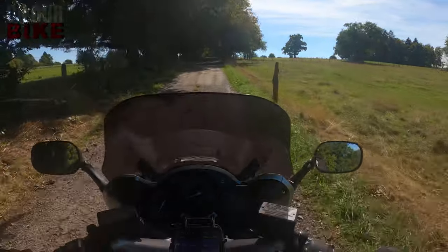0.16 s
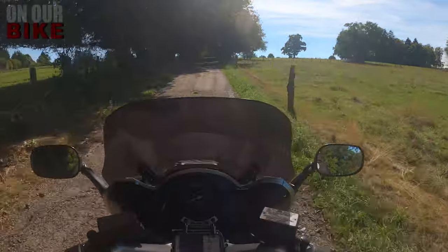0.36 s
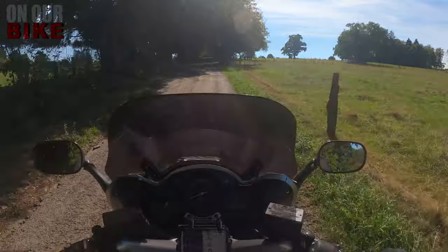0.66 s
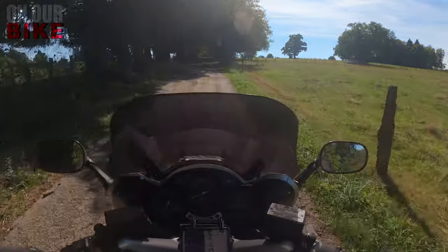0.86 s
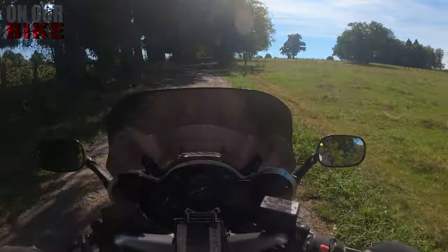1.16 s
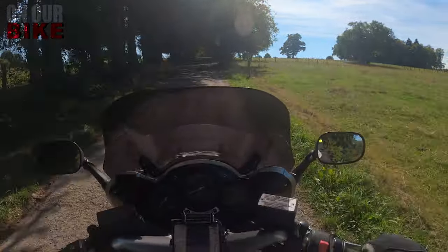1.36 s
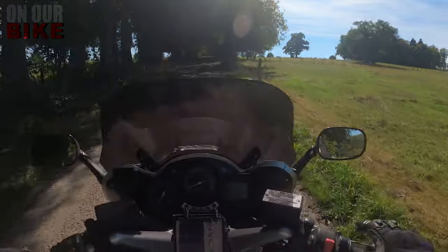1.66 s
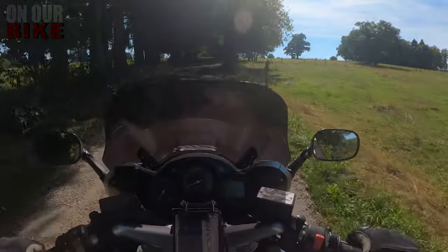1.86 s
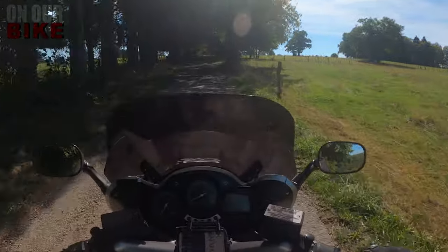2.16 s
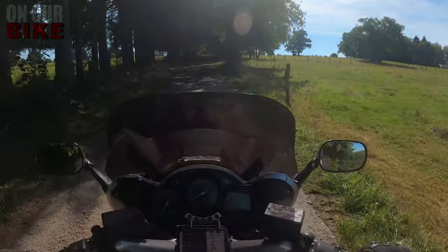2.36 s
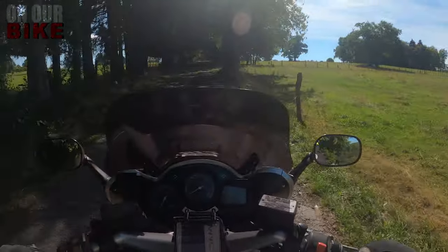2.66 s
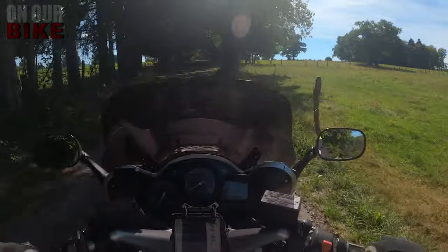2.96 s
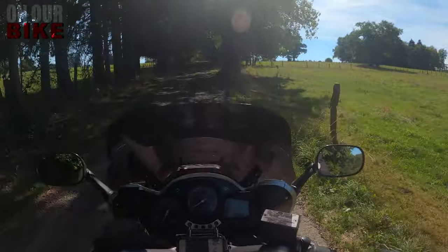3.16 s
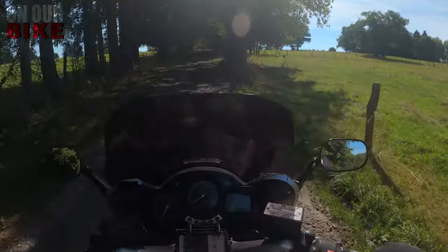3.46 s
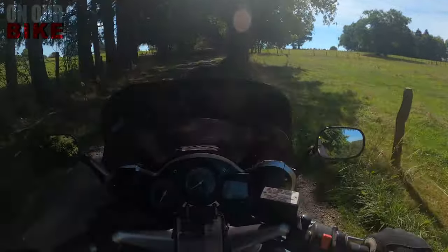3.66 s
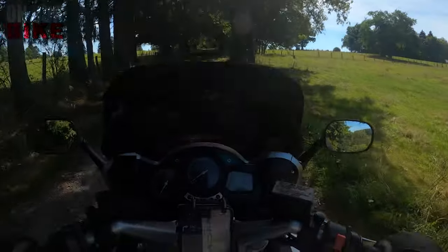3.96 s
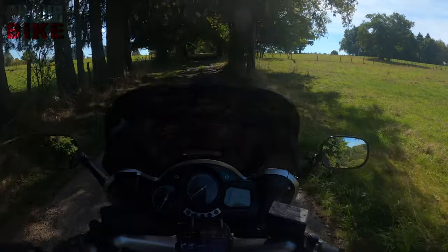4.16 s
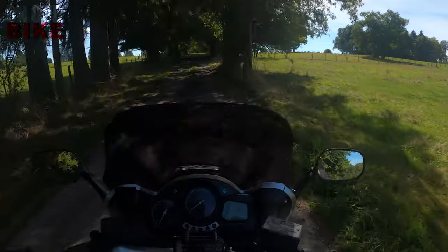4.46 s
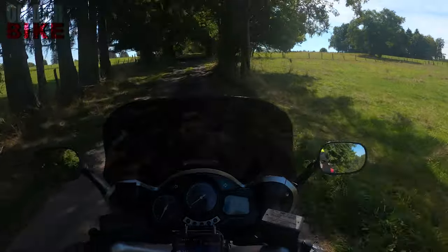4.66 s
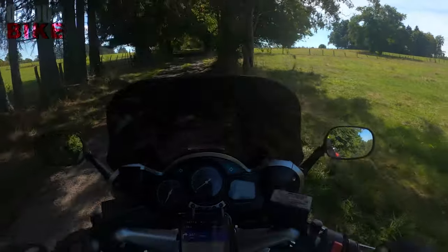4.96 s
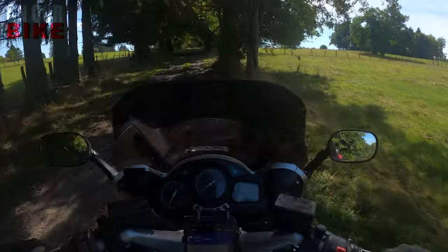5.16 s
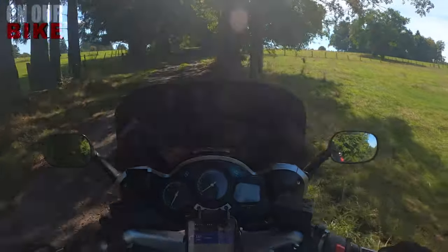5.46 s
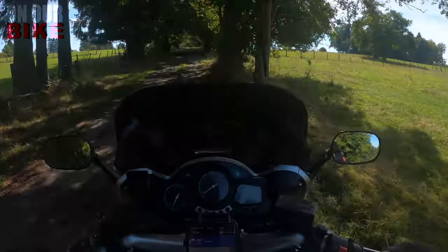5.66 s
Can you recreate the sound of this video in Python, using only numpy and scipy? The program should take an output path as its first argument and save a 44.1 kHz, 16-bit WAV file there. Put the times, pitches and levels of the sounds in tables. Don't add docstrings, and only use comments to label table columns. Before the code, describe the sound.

Heard from the rider's position, a motorcycle engine throbs deeply with a gear whine and mechanical clatter. Rough ground first rattles the fairing and jingles a loose metal part while low wind buffets the microphone. Revs swell at about one second, settle, then blip again and dip near the end. After two seconds the rattling eases and separate gravel crunches stand out more clearly. Open, dry, outdoor sound without echo.

```python
import sys
import numpy as np
from scipy import signal
from scipy.fft import rfft, irfft
from scipy.io import wavfile
from scipy.ndimage import uniform_filter1d

SR = 44100
rng = np.random.default_rng(int(sys.argv[2]) if len(sys.argv) > 2 else 0)


def bounce(signal):
    frames = np.transpose(np.atleast_2d(signal))
    limited = np.clip(frames, -1, 1)
    pcm = np.round(limited * 32767).astype(np.int16)
    wavfile.write(sys.argv[1], SR, pcm)


def natural_amplitude(level_db):
    exponent = np.asarray(level_db, float) / 20
    return 10 ** exponent


N = 256220
T = np.arange(N) / SR


def evened(x):
    return x / np.sqrt(np.mean(x ** 2) + 1e-20)


def curves(rows):
    s, *columns = np.transpose(rows)
    return [np.interp(T, s, column) for column in columns]


def swells(rows, width_s):
    return sum(db * np.exp(-((T - s) / width_s) ** 2) for s, db in rows)


def filtered(x, points):
    f, db = np.transpose(points)
    hz = np.fft.rfftfreq(len(x), 1 / SR)
    gain_db = np.interp(np.log(hz + 1), np.log(f + 1), db)
    return irfft(rfft(x) * natural_amplitude(gain_db), len(x))


def coloured(x, points):
    return evened(filtered(x, points))


def drift(hz):
    width = max(int(SR / hz / 2), 1)
    return evened(uniform_filter1d(uniform_filter1d(rng.standard_normal(N), width), width))


def resonance(x, hz, width_hz):
    return signal.lfilter(*signal.iirpeak(hz, hz / width_hz, SR), x)


def ring(x, modes):
    return evened(sum(natural_amplitude(db) * resonance(x, hz, width_hz) for hz, width_hz, db in modes))


def taps(per_s, spread_db):
    size = natural_amplitude(spread_db * np.minimum(rng.exponential(1, N), 4))
    sign = rng.choice([-1., 1.], N)
    return size * sign * (rng.random(N) < per_s / SR)


def patchy(x, depth_db):
    z = signal.stft(x, nperseg=1024, noverlap=768)[2]
    patches = uniform_filter1d(rng.standard_normal(z.shape), size=3, axis=0)
    patches = evened(uniform_filter1d(patches, size=10, axis=1))
    return evened(signal.istft(z * natural_amplitude(depth_db * patches), nperseg=1024, noverlap=768)[1][:N])


# f/Hz, level/dB per Hz
BUFFET_COLOUR = [(5, -5.5), (12, 3), (24, 1), (34, -23.5), (55, -9.5), (110, -15), (160, -23.5),
                 (250, -41.5), (500, -64.5)]
# f/Hz, width/Hz, level/dB
FAIRING_MODES = [(292.6, 163, -1), (463, 266, 1.5), (595, 150, -6.5), (890, 130, 0), (1160, 170, -10.5)]


def lane(buffet_db, rough_db):
    shudder_hz = 24 + 4 * drift(hz=4.1)
    shudder = np.sqrt(2) * np.cos(2 * np.pi * np.cumsum(shudder_hz) / SR)
    buffet = evened(coloured(rng.standard_normal(N), BUFFET_COLOUR) + 0.5 * shudder)
    buffet = evened(np.tanh(0.64 * buffet))
    shaking = rng.standard_normal(N) * natural_amplitude(2.1 * drift(hz=29.4))
    shaking = shaking + 0.63 * evened(taps(per_s=150, spread_db=2.0))
    rattle = ring(ring(shaking, FAIRING_MODES), FAIRING_MODES)
    return natural_amplitude(buffet_db + 2.5) * buffet + natural_amplitude(-43.5 + rough_db) * rattle


# f/Hz, width/Hz, level/dB
LOOSE_PART_MODES = [(7620, 260, 0), (8080, 260, 0), (6900, 300, -7), (10500, 500, -6)]
# t/s, level/dB
LOOSE_PART_JOLTS = [(.04, 11), (.12, 8), (.45, -10), (.6, -10), (.78, 12), (.88, 8), (.96, 13.5), (1.04, 2),
                    (1.12, 10.5), (1.28, 12), (1.36, 9.5), (1.53, 12), (1.64, -4), (1.76, 14)]


def jingle(rough_db):
    shaken = 0
    for hz, width_hz, db in LOOSE_PART_MODES:
        mode = [(hz, width_hz, 0)]
        shaken = shaken + natural_amplitude(db) * ring(ring(taps(per_s=83, spread_db=3.0), mode), mode)
    level_db = -65.5 + 0.24 * rough_db + swells(LOOSE_PART_JOLTS, width_s=0.045)
    rough_stretch = np.clip((1.95 - T) / 0.11, 0, 1)
    return natural_amplitude(level_db) * rough_stretch * evened(shaken)


def fuel_pump():
    pump_hz, cycle_s, dip_db = 5621, 1.48, -7
    sag = np.interp(T, [0, 4, 4.6, 5.81], [0, 0, -.012, -.015])
    song = np.cos(2 * np.pi * np.cumsum(pump_hz * (1 + sag + .0022 * drift(hz=20))) / SR)
    easing_db = dip_db * np.cos(np.pi * T / cycle_s) ** 4 * (T > .5)
    level_db = -66 + easing_db + 300 * sag + 1.5 * drift(hz=14)
    return np.sqrt(2) * natural_amplitude(level_db) * song


# t/s, peak level/dB, bass share/dB, pitch of what they strike f/Hz
STONE_HITS = [(0.635, -51, -6, 3480), (0.975, -45, 5, 3100), (1.026, -37, 14, 3570),
              (1.1798, -43, -4, 4800), (1.3299, -45, 7, 3093), (1.434, -48, -13, 3160),
              (1.5374, -33, -9, 8206), (2.165, -39, 12, 2968), (2.4739, -40, 7, 5495),
              (3.106, -36, -25, 5200), (3.116, -28, -13, 11800), (3.128, -38, -7, 12400),
              (3.139, -30, -9, 2980), (3.5525, -36, -17, 6000), (3.5959, -35, -6, 3040),
              (3.643, -35.5, 3.5, 3590), (3.782, -42, 10.5, 3070), (4.104, -33.5, 0, 3400),
              (4.124, -32, -6, 7900), (4.138, -31.5, -7, 8000), (4.2498, -51.5, 3, 3516),
              (4.376, -37, 0, 3322), (4.5211, -51, -6, 3450), (4.557, -30.5, 6, 6600),
              (4.677, -33.5, -11, 6000), (4.709, -34, 1, 8400), (5.405, -37.5, 12, 3121),
              (5.457, -40, 7, 3350), (5.627, -29, 3, 5900), (5.745, -32.5, -0.5, 5156)]


def stones():
    crunch_s = 0.0093
    grit = rng.standard_normal(N) + 0.9 * evened(taps(per_s=1200, spread_db=6.0))
    high = coloured(grit, [(1800, -10.0), (3000, 2.5), (4600, 2.5), (8000, -3.0),
                           (10000, -4), (12300, -2.0), (14000, -12), (16000, -21)])
    low = coloured(grit, [(600, -11), (1100, -9.0), (2000, -7.5), (3200, -43.5)])
    out = np.zeros(N)
    for s, db, bass_db, hz in STONE_HITS:
        at = slice(int(s * SR), int(s * SR) + SR // 5)
        u = np.maximum(T[at] - s, 0) / crunch_s
        crush = u ** 0.22 * np.exp(-u)
        struck = evened(resonance(grit[at], hz, width_hz=500))
        out[at] += natural_amplitude(db - 13) * crush * (high[at] + 0.45 * struck + natural_amplitude(bass_db + 3.5) * low[at])
    return out


# t/s, peak level/dB, f/Hz, time to fall 60 dB/s
RINGING_KNOCKS = [(0.648, -21.5, 890, 0.065), (.885, -28, 873, .07), (0.957, -26.5, 863.6, 0.16),
                  (1.034, -28, 900, 0.11), (1.085, -23.5, 845.6, 0.062), (1.218, -23.5, 890, 0.054),
                  (1.469, -28, 606.5, 0.11), (1.842, -19, 1161, 0.02), (1.844, -30, 701, 0.048),
                  (3.181, -34, 930, 0.2), (.832, -45, 4317, 0.052), (2.169, -43, 2772, .04),
                  (3.103, -44, 4500, 0.13), (3.104, -40, 8900, 0.043), (3.11, -48, 4570, 0.069),
                  (3.116, -52, 11740, 0.022), (3.128, -54, 12600, .03), (3.145, -47, 8800, .04),
                  (4.114, -44, 3340, 0.054), (4.115, -62, 3280, .05), (4.139, -45, 3310, 0.075),
                  (4.144, -39, 7900, .04), (4.558, -42, 8400, 0.045)]


def knocks():
    out, u = np.zeros(N), T[:SR // 5]
    rise = np.minimum(u / 0.0037, 1)
    for s, db, hz, t60_s in RINGING_KNOCKS:
        at = round(s * SR)
        out[at:at + len(u)] += natural_amplitude(db - 60 * u / t60_s) * rise * np.sin(2 * np.pi * hz * u)
    return out


def spurts(angle):
    gate = np.exp(7 * (np.cos(angle / 2 + .6) - 1)) * natural_amplitude(2.8 * drift(hz=20))
    hiss = coloured(rng.standard_normal(N), [(9500, -27), (12000, -7), (13600, 6), (14800, -10.5), (16000, -21)])
    return natural_amplitude(-70.5) * evened(gate * hiss)


# t/s, level/dB
INTAKE_GULPS = [
    (0, -6),
    (1.1, 13),
    (1.24, 16),
    (1.72, 13.5),
    (2.37, 9.5),
    (3.66, 11),
    (3.9, 6.5),
    (4.76, 10.5),
    (5.02, 18.5),
    (5.71, 13),
]


def airbox(angle):
    gulps = rng.standard_normal(N) * natural_amplitude(2.1 * np.cos(angle + 0.096))
    hum = ring(ring(gulps, [(604, 14, 0)]), [(580, 63, 0)])
    return natural_amplitude(-59 + swells(INTAKE_GULPS, width_s=0.065)) * hum


# f/Hz, level/dB per Hz
CASING_COLOUR = [(120, -26.5), (200, -7.5), (300, 1), (600, -3), (760, 4), (900, 10), (1150, -2),
                 (1500, 0.5), (1850, -4.5), (2200, -10.5), (3000, -13), (8000, -13.5), (12000, -21.5),
                 (15500, -23)]
# f/Hz, width/Hz, level/dB
COVER_MODES = [(1450, 60, 0), (1800, 90, 0), (1600, 80, -4)]
# t/s, level/dB
TREBLE_LULLS = [(.025, -5), (.36, -11), (.61, -8), (1.63, -9), (2.05, -13), (2.71, -1), (2.95, -3),
                (3.85, -1), (4.45, 2), (4.67, 0), (5.55, -3)]


def clatter(angle, load_db, rough_db):
    level_db = -49.5 + 0.27 * load_db + 0.22 * rough_db
    beat = np.cos(angle + 1.3) + 0.28 * np.cos(angle / 2 + 0.4)
    noise = rng.standard_normal(N) * natural_amplitude(1.56 * beat + 0.6 * drift(hz=36.3))
    noise = noise + 0.3 * evened(taps(per_s=600, spread_db=0.5))
    whole = patchy(coloured(noise, CASING_COLOUR), depth_db=2.)
    whole = whole + natural_amplitude(-18) * ring(ring(noise, COVER_MODES), COVER_MODES)
    band = signal.sosfilt(signal.butter(2, [1400, 3500], "bandpass", fs=SR, output="sos"), whole)
    treble = filtered(whole, [(5000, -20), (8500, -8.0), (11000, 0.5)])
    treble_db = 1.5 + 0.22 * rough_db + swells(TREBLE_LULLS, width_s=0.058)
    flicker_db = 2.4 * drift(hz=45)
    tilted = whole + treble * (natural_amplitude(treble_db + flicker_db) - 1)
    return natural_amplitude(level_db) * tilted / band.std()


def whine(angle, crank_hz, load_db, rough_db):
    teeth = 24.1
    level_db = -45.5 - 0.25 * load_db
    level_db = level_db - 3.5 * np.maximum(38.2 - crank_hz, 0)
    level_db = level_db - 0.58 * np.maximum(rough_db, 0)
    level_db = level_db + 1.16 * np.maximum(crank_hz - 46.9, 0)
    wobble = .45 * np.sin(angle) + .2 * np.sin(angle / 2) + .8 * drift(hz=10)
    wobble = wobble + 4.8 * natural_amplitude(.8 * load_db) * drift(hz=6.5)
    beads_db = 2.2 * np.cos(angle + 2.3) + 1.9 * drift(hz=30)
    mesh = teeth * angle + wobble
    side_db = -3.5 + 2.2 * load_db - 2.5 * np.maximum(crank_hz - 41, 0)
    tones = np.cos(mesh) + natural_amplitude(side_db) * np.cos(mesh + angle) + natural_amplitude(-21.0) * np.cos(2 * mesh)
    return natural_amplitude(level_db) * evened(natural_amplitude(beads_db) * tones)


# order in crank turns, level/dB against the third order
UPPER_ORDERS = [(4, -19), (5, -23.5), (6, -57), (1.5, -58.5), (2.5, -24.5)]
# f/Hz, level/dB
PIPE_RESPONSE = [(30, -6), (53, 1.5), (64, 1.5), (82, 9), (100, 3.5), (130, -2), (160, -11)]


def exhaust(angle, crank_hz, load_db):
    f, pipe_db = np.transpose(PIPE_RESPONSE)
    once_db = -21 + .3 * load_db + np.interp(crank_hz, f, pipe_db)
    firing_db = -22.5 + load_db + np.interp(2 * crank_hz, f, pipe_db)
    third_db = -27.5 + load_db + np.interp(3 * crank_hz, f, pipe_db)
    orders = [(1, once_db), (2, firing_db), (3, third_db)]
    orders += [(order, third_db + db) for order, db in UPPER_ORDERS]
    lag, uneven = .75, .07
    pulse = 0
    for order, db in orders:
        level = natural_amplitude(db + 0.57 * order * drift(hz=4.6))
        pulse = pulse + level * np.cos(order * angle + lag + uneven * order * drift(hz=27.1))
    return -np.sqrt(2) * pulse


# t/s, crank turns f/Hz, load level/dB
THROTTLE = [(.58, 39.33, -4.5), (.97, 46, -4), (1.08, 51.1, -1), (1.21, 53.9, -2), (1.39, 50.86, -6),
            (1.54, 43.18, -8), (1.84, 38.53, -6), (3.43, 37.98, -4.5), (3.62, 45.77, -2),
            (3.79, 40.75, -2.5), (4.0, 39.73, -1.5), (4.12, 43.52, -0.5), (4.56, 31.46, 0.5),
            (4.73, 34.48, -0.5), (4.87, 42.55, 1.5), (4.98, 40.2, -0.5), (5.64, 35.35, 0.5),
            (5.81, 30.04, -0.5)]
# t/s, buffeting level/dB, roughness level/dB
LANE_SURFACE = [(0.0, -10.5, 11), (.14, -19, 7), (.25, -17.5, 6.5), (.34, -20.5, 6), (1.03, -18, 7.5),
                (1.32, -17, 5), (1.82, -19, 1), (2.1, -20.5, -1), (2.65, -24.5, -5), (3.27, -22.5, -7),
                (3.43, -28, -9.5), (3.6, -28.5, -3), (4.0, -28, -3), (4.35, -37, -1), (4.5, -25, -4),
                (5.43, -25, -0.5), (5.55, -32, -1.5), (5.81, -19.5, -2)]


def scene():
    flywheel_s = .06
    gust_db, duck = -19, 1.5
    crank_hz, load_db = curves(THROTTLE)
    crank_hz = uniform_filter1d(crank_hz, round(flywheel_s * SR), mode="nearest")
    buffet_db, rough_db = curves(LANE_SURFACE)
    load_db = load_db - duck * np.maximum(buffet_db - gust_db, 0)
    angle = 2 * np.pi * np.cumsum(crank_hz) / SR
    road = lane(buffet_db, rough_db) + stones() + knocks()
    small_parts = jingle(rough_db) + fuel_pump()
    engine = spurts(angle) + airbox(angle) + clatter(angle, load_db, rough_db)
    engine = engine + whine(angle, crank_hz, load_db, rough_db) + exhaust(angle, crank_hz, load_db)
    return (road + small_parts + engine)[None]


def band_limit(x):
    return signal.sosfilt(signal.butter(12, 15610, fs=SR, output="sos"), x)


# f/Hz, level/dB
CASE_RESPONSE = [(2300, -0.5), (2800, 0), (3200, -3.5), (3600, -3), (4050, -7), (4900, -2.5), (6200, -5.5),
                 (7000, -5), (8100, -7), (9000, -7), (13500, -9.5), (15500, -13.5)]


def record(dry):
    edge = 2048
    cased = filtered(np.pad(dry[0], edge, mode="linear_ramp"), CASE_RESPONSE)[edge:-edge]
    fade = np.clip(np.minimum(T, T[::-1]) / .004, 0, 1)
    mix = (cased * fade)[None]
    return band_limit(mix)


dry = scene()
out = record(dry)
bounce(out)
```